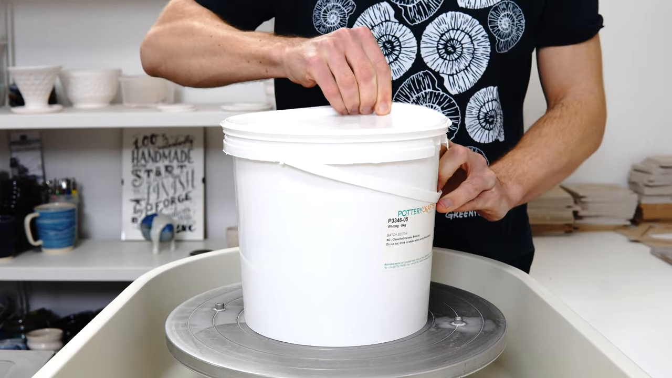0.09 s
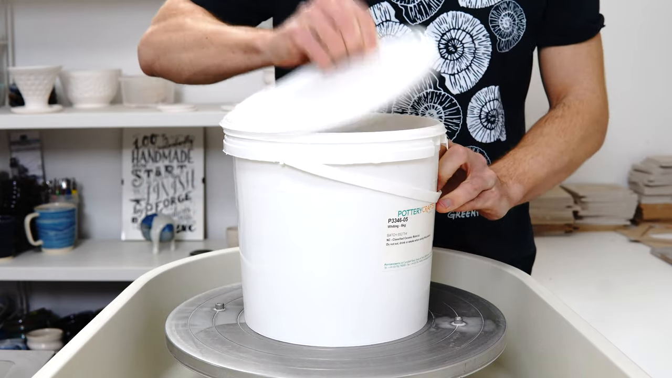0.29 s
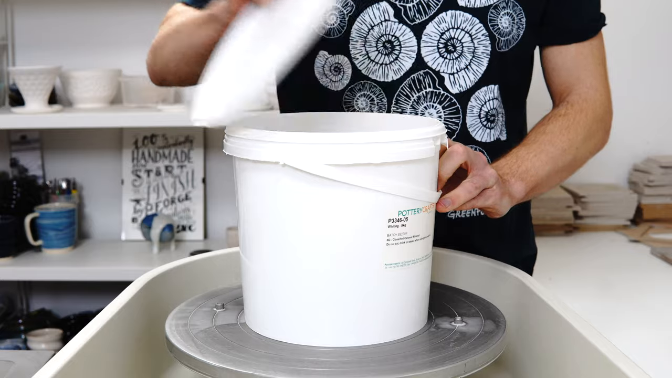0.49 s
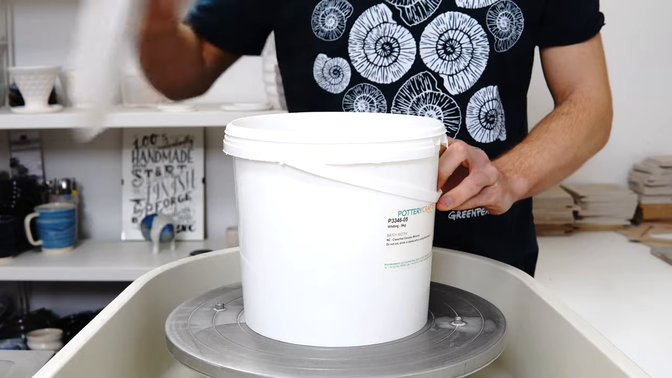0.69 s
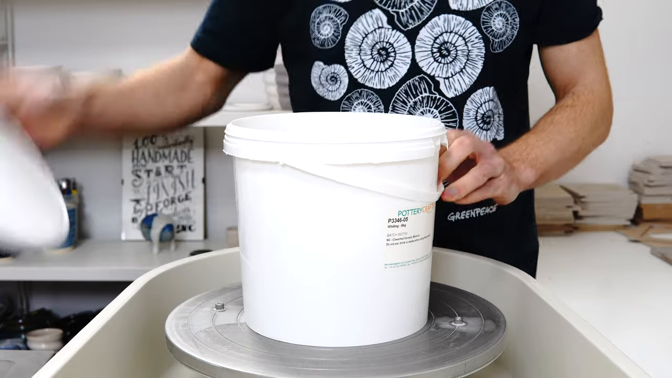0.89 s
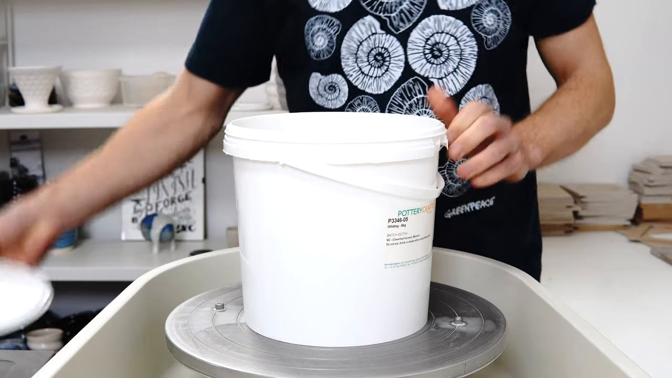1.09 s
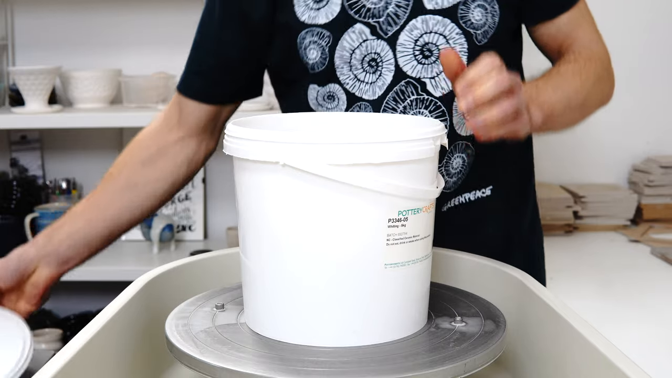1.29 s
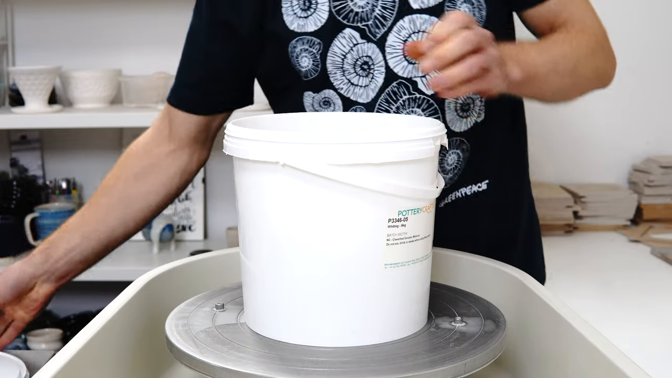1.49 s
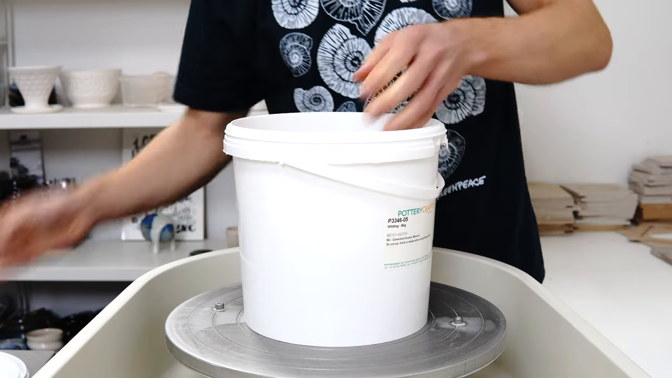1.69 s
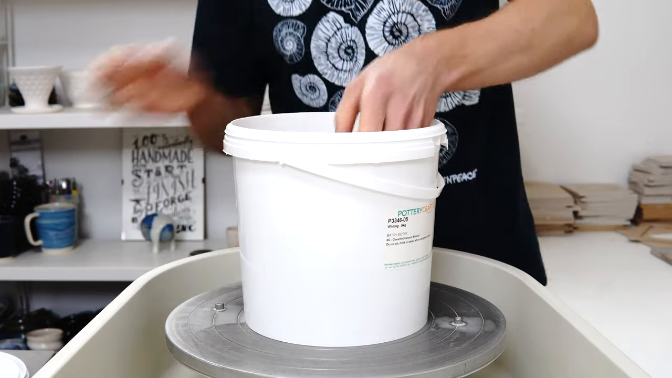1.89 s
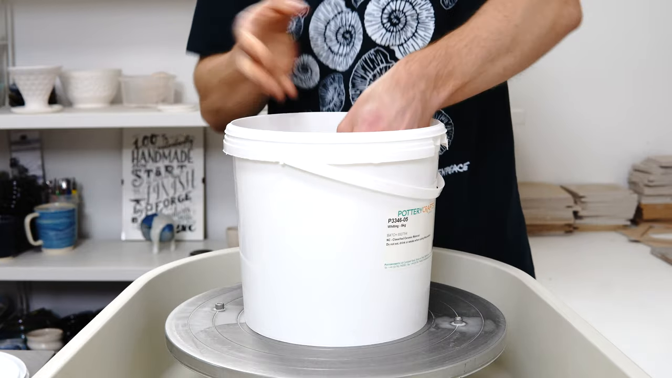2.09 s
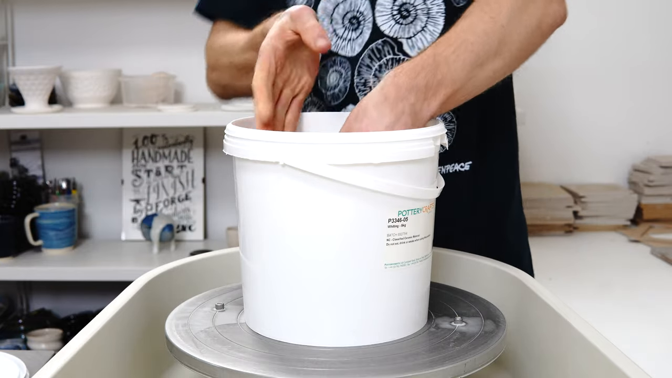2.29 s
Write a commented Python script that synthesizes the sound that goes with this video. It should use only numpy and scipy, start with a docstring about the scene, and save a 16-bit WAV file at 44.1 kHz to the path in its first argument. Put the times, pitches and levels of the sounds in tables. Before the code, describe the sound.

A plastic lid is pulled off a tub with hollow, rising booms, scrapes and snaps, is carried aside with faint rubbing, then slaps twice on a bench; a hand softly bumps inside. Close mono microphone, small workshop.

```python
"""A plastic lid is pulled off a tub in a small workshop: fingers make the closed tub hum, then the rim scrapes in
noise grains while jolts ring the tub as fading notes, on the whole rising as the mouth opens; puffs thump below.
The lid clips the rim with a snap, is carried aside with rubbing noise and thin wavering whistles, and slaps down
twice on a hard bench as blows, bright cracks and ringing lid tones. Last, a hand bumps inside the tub.
Shaped noise makes a steady hush behind it all, and the loudest peaks clip."""
import sys
import numpy as np
from scipy import signal
from scipy.fft import rfft, irfft
from scipy.io import wavfile
from scipy.ndimage import uniform_filter1d

SR = 44100
rng = np.random.default_rng(int(sys.argv[2]) if len(sys.argv) > 2 else 0)


def convert_level_to_amplitude(level_db):
    """Map a level in decibels to its linear amplitude factor."""
    exponent = np.asarray(level_db, float) / 20
    return 10 ** exponent


def wav_record(signal):
    """Record a signal, one row per channel, as 16-bit PCM in the file named by sys.argv[1]."""
    frames = np.transpose(np.atleast_2d(signal))
    bounded = np.clip(frames, -1, 1)
    # unit amplitude maps onto the largest positive 16-bit level
    quanta = np.round(bounded * 32767).astype(np.int16)
    wavfile.write(sys.argv[1], SR, quanta)


N = 105840  # samples in the scene


def evened(x):
    """Scale a sound to an average (rms) strength of 1."""
    return x / np.sqrt(np.mean(x ** 2) + 1e-20)


def read(points, hz):
    """Read a table of (hz, value) at any pitch, along a logarithmic pitch scale."""
    point_hz, value = np.transpose(points)
    return np.interp(np.log(hz + 1), np.log(point_hz + 1), value)


def follow(start_s, level_db):
    """A loudness curve through the given points, practically silent outside them."""
    return convert_level_to_amplitude(np.interp(np.arange(N) / SR, start_s, level_db, -120, -120))


def add(mix, start_s, sound):
    """Lay a sound into the mix at its start time, cut off at the end of the mix."""
    part = mix[round(start_s * SR):][:len(sound)]
    part += sound[:len(part)]


def colour(x, points, slope_db=0):
    """Filter with the given spectrum, tilted by slope_db per octave; minimum phase, so nothing sounds early."""
    hz = abs(np.fft.fftfreq(8192, 1 / SR))
    level_db = read(points, hz) + slope_db * np.log2((hz + 1) / 1000)
    log_level = np.log(convert_level_to_amplitude(np.maximum(level_db, -100)))
    spectrum = np.exp(np.conj(signal.hilbert(log_level)))
    taps = np.fft.ifft(spectrum).real[:4096]
    return signal.oaconvolve(x, taps)[:len(x)]


def room(x, wet_db):
    """Dry sound plus echoes at random moments, each pitch band dying at its own speed."""
    # how long the room rings: pitch_hz, t60_s (time to fall by 60 dB)
    room_fade = [(200, 0.23), (530, 0.35), (1390, 0.32), (3680, 0.31), (9700, 0.28)]
    taps = np.zeros(SR // 2)
    slots = np.arange(90, len(taps) - 8, 8)
    taps[slots + rng.integers(0, 8, len(slots))] = rng.choice([-1., 1.], len(slots))
    hz, t, bands = signal.stft(taps, SR, nperseg=256)
    fade = convert_level_to_amplitude(-60 * t / read(room_fade, hz)[:, None])
    tail = signal.istft(bands * fade, SR, nperseg=256)[1]
    tail = tail / np.linalg.norm(tail)
    return x + convert_level_to_amplitude(wet_db) * signal.fftconvolve(x, tail)[:len(x)]


def burst(fade_s, points, peak_db, slope_db=0):
    """A short crack of fading noise with the given colour and peak."""
    t = np.arange(4096) / SR
    noise = rng.standard_normal(4096) * np.exp(-t / fade_s)
    crack = colour(noise, points, slope_db)
    return convert_level_to_amplitude(peak_db) * crack / abs(crack).max()


def tub():
    """Each jolt rings the air inside and the wall as fading sine waves; puffs of air thump below."""
    # jolts that ring the tub: start_s, level_db, air_hz, wall_hz, wall_db (wall note against air note)
    jolts = [(.186, -20, 275.6, 185, 5), (.2, -24.5, 265, 202, 17.5), (0.224, -3, 256.7, 191, 1),
             (0.25, 3.5, 247.5, 186, -3), (0.26, -15.5, 282, 205, 14), (0.282, 1, 275, 206.4, 7.5),
             (.297, 0.5, 274.6, 208, -1.5), (0.314, -12, 295, 231, -12), (0.328, 5, 284, 233, -35),
             (.344, -8.5, 339.4, 246, -10), (0.355, -0.5, 317, 244, -6.5), (.374, -10.5, 302.6, 247, 8),
             (.385, -27.5, 332, 250, -15), (0.428, -20, 335, 236, -9), (0.5096, -1.5, 323, 232, 0.5),
             (0.5216, -1.5, 318.9, 235, -6), (.535, -9.5, 322, 240, -8), (0.552, -10, 333.5, 216, -2),
             (.575, -27.5, 341, 226, -15), (2.311, -28, 335, 232, -20)]
    # air rushing past the seal: start_s, level_db, pitch_hz
    puffs = [(0.22, -10.5, 100), (0.282, -8.5, 66), (.515, -18.5, 97)]
    rise_s = 0.004
    air_t60_s, wall_t60_s, puff_t60_s = 0.093, 0.071, 0.098
    linger_db, linger_t60_s = -18, 0.37  # the air note keeps humming faintly after each jolt
    upper_hz, upper_db, upper_t60_s = 854, -26, 0.17  # faint higher note of the tub
    out = np.zeros(N)
    t = np.arange(SR // 3) / SR

    def ring(level_db, hz, t60_s):
        """A sine wave that swells quickly and dies away."""
        fade = convert_level_to_amplitude(level_db - 60 * t / t60_s)
        rise = 1 - np.exp(-t / rise_s)
        return fade * rise * np.sin(2 * np.pi * hz * t)

    for start_s, level_db, air_hz, wall_hz, wall_db in jolts:
        add(out, start_s, ring(level_db, air_hz, air_t60_s))
        add(out, start_s, ring(level_db + linger_db, air_hz, linger_t60_s))
        add(out, start_s, ring(level_db + wall_db, wall_hz, wall_t60_s))
        add(out, start_s, ring(level_db + upper_db, upper_hz, upper_t60_s))
    for start_s, level_db, hz in puffs:
        add(out, start_s, ring(level_db, hz, puff_t60_s))
    return out


def scrape(stroke, points):
    """Friction as dense uneven clicks under a stroke; body and top treble swell apart."""
    grains_per_s, grain_spread_db = 5000, 2.6
    split_hz = 6500  # the top treble lies above this

    def high_pass(x, hz):
        """Keep only what lies above hz, without delay."""
        return signal.sosfiltfilt(signal.butter(3, hz, "high", fs=SR, output="sos"), x)

    size = convert_level_to_amplitude(grain_spread_db * np.minimum(rng.exponential(1, N), 5))
    present = rng.random(N) < grains_per_s / SR
    grains = colour(size * present * rng.choice([-1., 1.], N), points)
    top = high_pass(grains, split_hz)
    body = grains - top
    body = body / high_pass(body, 1500).std()  # the body level counts only what lies above 1500 Hz
    start_s, body_db, top_db = np.transpose(stroke)
    return body * follow(start_s, body_db) + evened(top) * follow(start_s, top_db)


def rim_scrape():
    """The rim of the lid drags on the rim of the tub."""
    # loudness of the drag: start_s, body_db, top_treble_db
    rim_stroke = [
        (0.0, -44, -58.5), (0.046, -41, -61), (0.116, -62, -83.5), (0.148, -42.5, -64.5), (0.182, -48.5, -78),
        (0.19, -35.5, -55), (0.224, -28.5, -38.5), (0.24, -29, -43), (0.256, -28, -41), (0.342, -28.5, -44.5),
        (0.36, -21.5, -33), (0.43, -35.5, -55), (0.462, -42, -47.5), (0.5, -36, -52), (0.516, -23.5, -29),
        (0.53, -35.5, -49), (0.598, -48, -60.5), (0.72, -67, -67.5)]
    # tone of the drag: pitch_hz, relative_db (per Hz)
    rim_colour = [(250, -32.5), (420, 3.5), (512, -4.5), (772, -1), (1460, -6), (1990, -10), (2240, -9.5),
                  (3650, -6.5), (6820, -29.5), (14000, -37.5), (16000, -50)]
    return scrape(rim_stroke, rim_colour)


def carry_rub():
    """The hand rubs on the lid while carrying it aside."""
    # loudness of the rubbing: start_s, body_db, top_treble_db
    carry_stroke = [
        (0.72, -61, -69), (0.754, -69, -79), (0.806, -51, -62), (0.824, -54, -55), (0.866, -50.5, -61),
        (0.904, -47.5, -55), (0.96, -49.5, -57.5), (1.026, -51, -66), (1.042, -41.5, -58), (1.096, -42.5, -57),
        (1.198, -65.5, -82), (1.202, -62.5, -83.5), (1.266, -64.5, -76.5), (1.276, -69, -84),
        (1.348, -63.5, -79.5), (1.354, -56, -66.5), (1.384, -58, -70.5), (1.39, -58.5, -63.5)]
    # tone of the rubbing: pitch_hz, relative_db (per Hz)
    carry_colour = [(180, -30), (300, -2.5), (433, -3.5), (537, -10), (1010, -5.5), (1340, -13), (1720, -7),
                    (2170, -9), (4590, -11.5), (6960, -24.5), (16000, -31)]
    return scrape(carry_stroke, carry_colour)


def hand_rub():
    """The hand rubs inside the tub."""
    # loudness of the rubbing: start_s, body_db, top_treble_db
    hand_stroke = [
        (2.26, -75, -73), (2.274, -77.5, -88), (2.28, -58.5, -78.5), (2.298, -46.5, -67), (2.32, -45, -78.5),
        (2.342, -59.5, -83), (2.374, -56, -77), (2.394, -66, -70.5), (2.4, -50, -80)]
    # tone of the rubbing: pitch_hz, relative_db (per Hz)
    hand_colour = [(88, -29), (150, -6), (341, -6), (457, -11.5), (821, -18.5), (905, -7.5), (1190, -25.5),
                   (1720, -23.5), (3490, -24.5), (16000, -61)]
    return scrape(hand_stroke, hand_colour)


def squeaks():
    """Thin whistles: sine waves whose pitch wavers at random; they start fast and fade."""
    # whistles: start_s, pitch_hz, peak_db, length_s, waver_hz (typical pitch drift)
    whistles = [(1.035, 1740, -37, 0.089, 35), (0.94, 2100, -45, 0.041, 72), (1.6, 1686, -50, .05, 46),
                (0.86, 960, -47, 0.14, 26), (1.062, 1008, -46, 0.092, 61), (1.12, 1435, -51, .21, 4),
                (1.032, 4500, -45, .025, 30), (.88, 1700, -56, 0.092, 21), (1.351, 2550, -54, .025, 40),
                (2.41, 990, -39, 0.044, 60), (2.34, 3370, -51.5, .04, 40), (2.5, 2500, -51, 0.028, 60),
                (2.364, 1650, -43, 0.034, 60), (2.359, 980, -38.5, 0.031, 53)]
    out = np.zeros(N)
    for start_s, hz, peak_db, length_s, waver_hz in whistles:
        t = np.arange(0, length_s, 1 / SR)
        waver = evened(uniform_filter1d(rng.standard_normal(SR), 200))[:len(t)]
        shape = np.sin(np.pi * (t / length_s) ** .6)
        phase = 2 * np.pi * np.cumsum(hz + waver_hz * waver) / SR
        add(out, start_s, convert_level_to_amplitude(peak_db) * shape * np.sin(phase))
    return out


def ticks():
    """Small plastic snaps, each a very short burst of noise."""
    # snaps: start_s, peak_db
    snaps = [(0.1909, -31.5), (0.2078, -18.5), (0.2186, -14), (0.2588, -11), (0.2808, -13), (0.3114, -14),
             (0.5141, -10.5), (1.038, -38), (1.355, -39), (2.29, -42), (2.3674, -53)]
    # tone of a snap: pitch_hz, relative_db
    snap_colour = [(290, -25.5), (500, -9), (1320, -29), (2980, -13.5), (3250, -18.5), (4280, -20),
                   (12100, -42.5), (16000, -42)]
    fade_s = .004
    out = np.zeros(N)
    for start_s, peak_db in snaps:
        add(out, start_s, burst(fade_s, snap_colour, peak_db))
    return out


def slaps():
    """The lid hits the bench and rattles: a blow, a bright crack and the ringing tones of the lid."""
    # hits: start_s, level_db, brightness_db (per octave), crack_peak_db
    hits = [(1.3979, 1.5, -0.2, 19), (1.4044, -9.5, -2.1, 4.5), (1.4085, 4, 1.4, 7), (1.428, 1.5, 2.5, -23),
            (1.526, -12, -0.2, -33), (1.557, -18.5, -.9, -22.5), (1.5914, 4.5, 0.45, 9),
            (1.6019, -2, 2.2, -5.5), (1.621, -7.5, -2.1, -21.5)]
    # tone of a hit: pitch_hz, relative_db
    hit_colour = [(60, -39), (110, -9.5), (200, -9), (350, 0.5), (480, -5.5), (870, -1.5), (1150, -5.5),
                  (2000, -10), (3500, -12.5), (4400, -22), (8000, -35), (15000, -51), (17000, -67)]
    # ringing tones of the lid: pitch_hz, relative_db, t60_s (time to fall by 60 dB)
    lid_tones = [(370, -13, 0.033), (562, -3.5, 0.026), (667, -5, 0.026), (851, -3, 0.15),
                 (929, -5.5, 0.17), (985, -10.5, 0.12), (1226, -6, 0.042), (1258, -12.5, 0.078),
                 (1535, -2, .04), (1975, -12, 0.075), (2540, -26, .06), (3200, -17, .06)]
    lid_db, wet_db = -19.5, 9  # all lid tones against the blow; room tail against the dry hit
    crack_fade_s, crack_slope_db = .0007, 3  # cracks are tilted towards the treble, dB per octave
    out = np.zeros(N)
    t = np.arange(SR // 2) / SR
    click = 1. * (t == 0)
    hz, tone_db, t60_s = np.transpose(lid_tones)[:, :, None]
    tones = convert_level_to_amplitude(tone_db - 60 * t / t60_s) * np.sin(2 * np.pi * hz * t)
    for start_s, level_db, slope_db, crack_db in hits:
        blow = colour(click, hit_colour, slope_db)
        blow = blow / abs(blow).max()
        # every hit excites the tones in a different mix
        touch = rng.uniform(0.52, 1.22, (len(lid_tones), 1)) * rng.choice([-1, 1], (len(lid_tones), 1))
        hit = blow + convert_level_to_amplitude(lid_db) * (touch * tones).sum(0)
        add(out, start_s, convert_level_to_amplitude(level_db) * room(hit, wet_db))  # each hit draws its own echoes
        add(out, start_s, burst(crack_fade_s, hit_colour, crack_db, crack_slope_db))
    return out


def fuzz(hz, width_hz, count):
    """Narrow noise around one note: slow random swings moved up to its pitch."""
    a, b = rng.standard_normal((2, count + 4000))  # the extra samples let the filter settle
    slow = signal.lfilter([1], [1, -np.exp(-np.pi * width_hz / SR)], a + 1j * b)[-count:]
    carrier = np.exp(2j * np.pi * hz * np.arange(count) / SR)
    return evened((slow * carrier).real)


def murmur():
    """The closed tub hums softly under the fingers, as narrow noise around a few notes."""
    # loudness of the hum: start_s, level_db
    hum_level = [(0.0, -35), (0.048, -29), (0.126, -39.5), (0.18, -27.5)]
    # notes of the hum: pitch_hz, width_hz, relative_db
    hum_notes = [(185, 18, -4.5), (285, 31, -2.5), (500, 58, -11)]
    hum = sum(convert_level_to_amplitude(note_db) * fuzz(hz, width_hz, N) for hz, width_hz, note_db in hum_notes)
    start_s, level_db = np.transpose(hum_level)
    return evened(hum) * follow(start_s, level_db)


def hush():
    """Low rumble and faint hiss of the workshop: steady noise shaped by pitch."""
    # tone of the hush: pitch_hz, relative_db
    hush_colour = [(12, -28), (20, -14.5), (48, 2), (70, -12), (101, -9), (120, -19.5), (241, -21),
                   (310, -30), (434, -33), (678, -33), (897, -28), (1330, -45.5), (2990, -48.5),
                   (5230, -51), (16000, -61.5)]
    level_db = -38.5
    spectrum = rfft(rng.standard_normal(N)) * convert_level_to_amplitude(read(hush_colour, np.fft.rfftfreq(N, 1 / SR)))
    return convert_level_to_amplitude(level_db) * evened(irfft(spectrum, N))


def scene():
    """All sources in the room; the tub and the small close sounds get different amounts of echo."""
    tub_wet_db, near_wet_db = -15, -6.5
    near = rim_scrape() + carry_rub() + hand_rub() + squeaks() + ticks()
    mix = room(tub() + murmur(), tub_wet_db) + room(near, near_wet_db) + slaps() + hush()
    return mix[None]  # one channel


def top_cut(x):
    """Nothing passes above the cut-off."""
    return signal.sosfilt(signal.butter(12, 16650, fs=SR, output="sos"), x)


def record(dry):
    """Peaks beyond full scale are cut off flat."""
    clipped = np.clip(dry, -1, 1)
    return top_cut(clipped)


dry = scene()
out = record(dry)
wav_record(out)
```